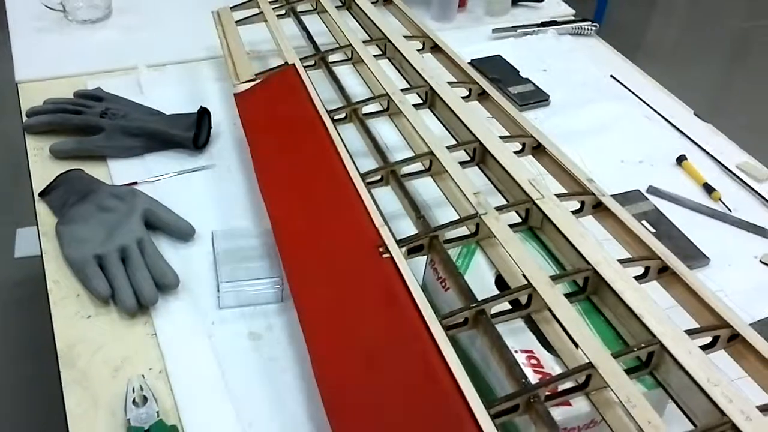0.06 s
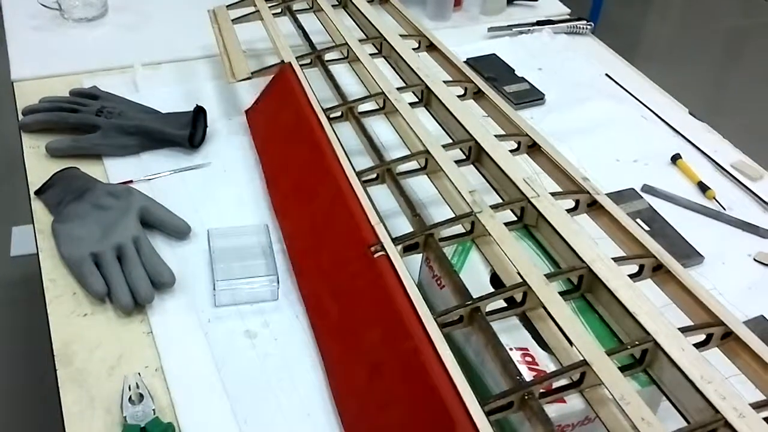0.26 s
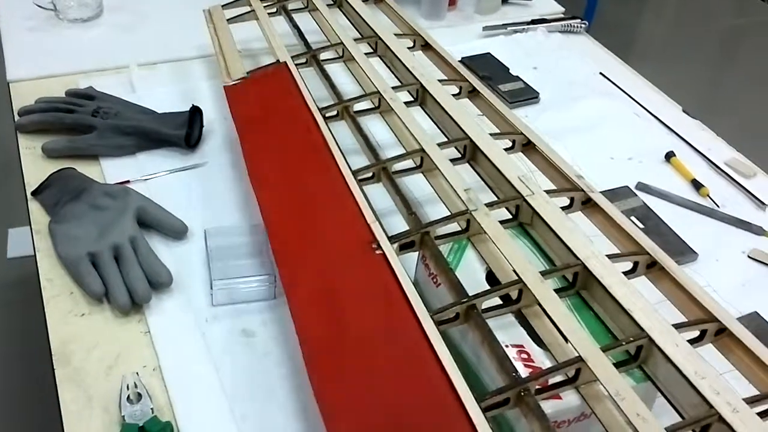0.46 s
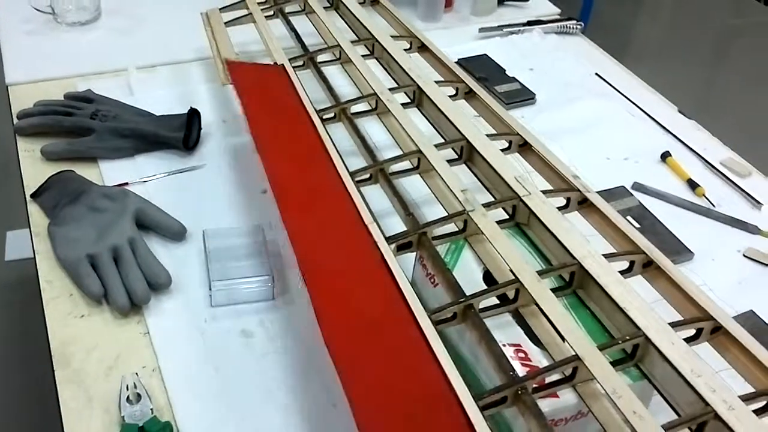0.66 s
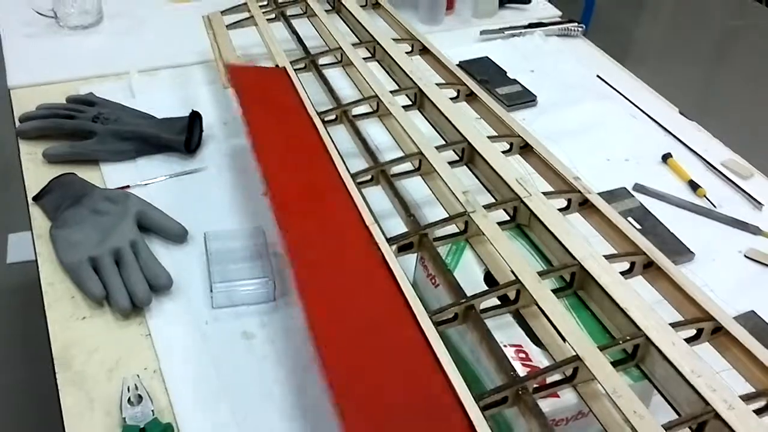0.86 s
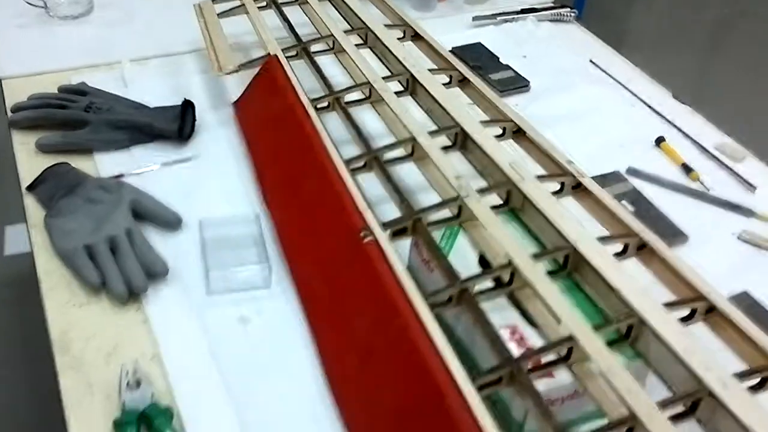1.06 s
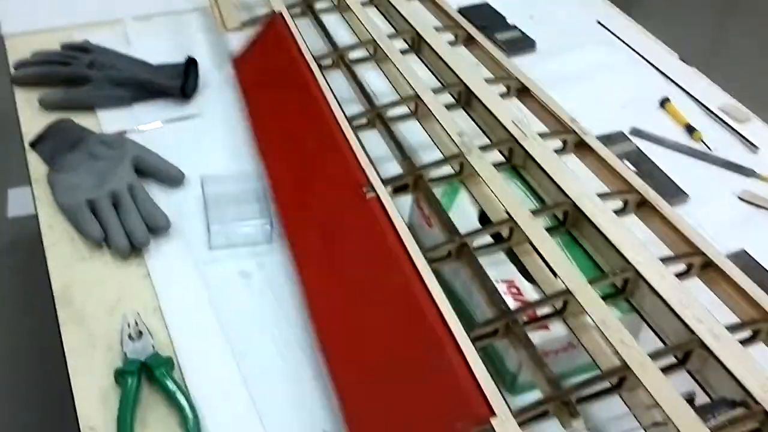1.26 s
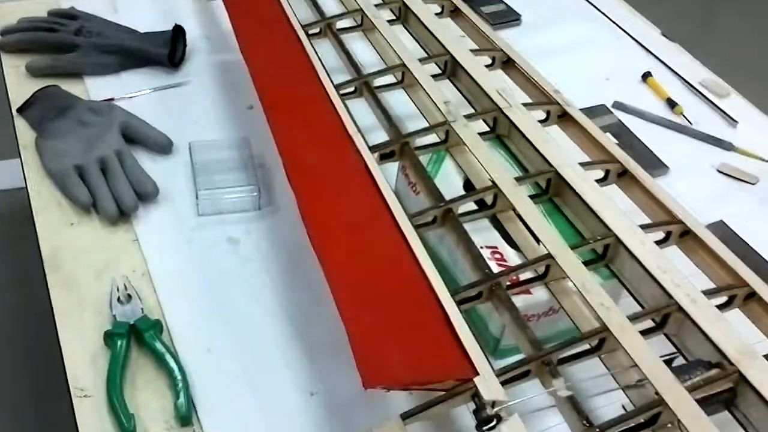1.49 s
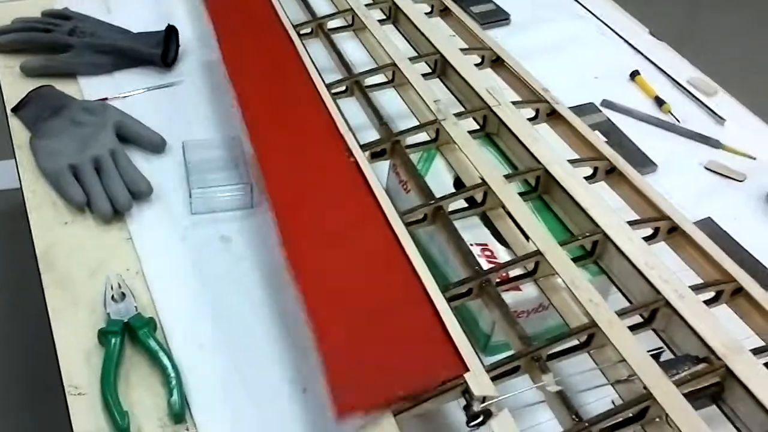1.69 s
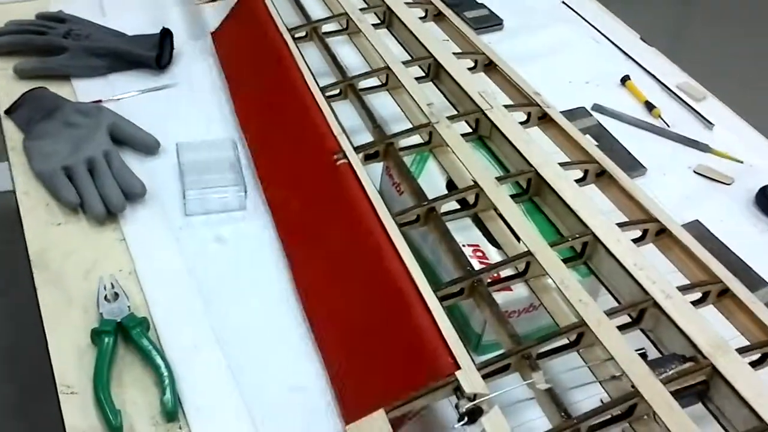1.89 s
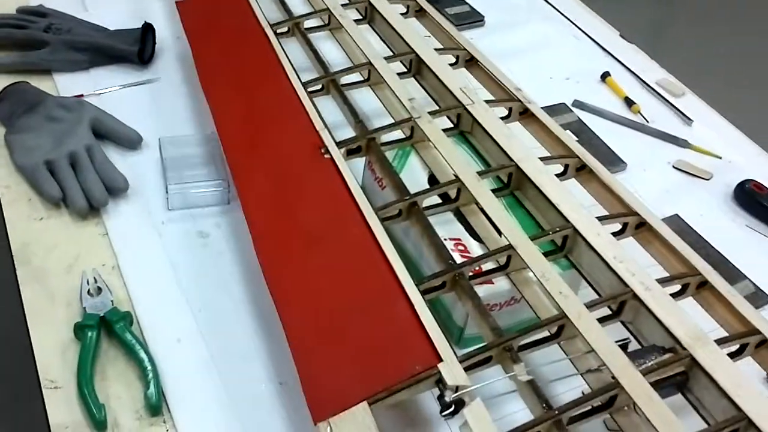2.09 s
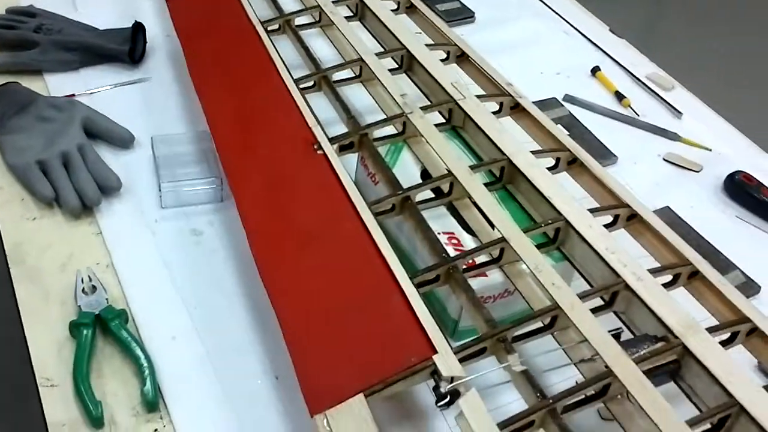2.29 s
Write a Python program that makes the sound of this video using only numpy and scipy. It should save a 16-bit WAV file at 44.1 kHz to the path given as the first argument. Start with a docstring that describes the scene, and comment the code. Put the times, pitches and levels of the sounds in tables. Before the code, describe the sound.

A small servo whirs in about six quick, rasping bursts, swinging the flap of a wooden model wing back and forth. Its gears rattle and whine, the linkage knocks lightly, and the flap chatters to a stop, close by in a workshop.

```python
"""On a workbench, a small servo swings the aileron of a bare wooden model wing back and forth.
Tooth impacts force the wing frame into vibration: the gears rattle, and rasp brightly whenever the
motor drives hard. At full speed their periodic meshing is heard as a whine. The slack linkage knocks
now and then as the aileron swings; on the last swing the aileron chatters to a stop."""
import sys
import numpy as np
from scipy import signal
from scipy.fft import rfft, irfft
from scipy.io import wavfile
from scipy.ndimage import uniform_filter1d

SR = 44100
rng = np.random.default_rng(int(sys.argv[2]) if len(sys.argv) > 2 else 0)


def int16_out(signal):
    """Quantize to a 16-bit WAV file."""
    q = np.round(np.clip(np.atleast_2d(signal).T, -1, 1) * 32767)
    wavfile.write(sys.argv[1], SR, q.astype(np.int16))


N = 108045
T = np.arange(N) / SR

# Levels in the tables are relative; each source applies its own gain.
# Spectral density of the room noise: frequency_hz, level_db
NOISE_SPECTRUM = [(20,-6.5), (45,2.5), (100,-3), (200,-3), (400,-8.5), (1000,-7.5), (2500,-18.5),
                  (5000,-20), (10000,-22), (16000,-30)]
# Reverberation time of the workshop: frequency_hz, t60_s
ROOM_DECAY = [(200,0.39), (1000,0.29), (2500,0.29), (5000,0.16), (12000,0.089)]
# Resonances of wing and servo case: frequency_hz, width_hz, lift_db
WING_MODES = [(416,68,4), (683,35,11), (1141,71,4.5), (1474,45,3.5), (1720,40,6.5), (1906,86,2.5),
              (2085,82,1.5), (2475,54,4.5), (2790,55,8), (3390,100,5), (3910,230,2), (4637,160,5.5)]
# Spectral envelopes of the sounds that pass through the wing: frequency_hz, level_db
THUD_SPECTRUM = [(100,-27), (270,-17.5), (370,-2.5), (460,6.5), (560,1.5), (700,-8), (1000,-3), (3000,-80)]
BLOW_SPECTRUM = [(100,-29.5), (250,-23), (340,-5.5), (460,-4), (600,-2.5), (780,-6.5), (930,8), (1150,6),
                 (1300,1.5), (1500,3.5), (1750,-3), (2200,-2.5), (2700,-17.5), (3050,-14.5), (3600,-13),
                 (5000,-22), (7500,-43.5), (11000,-43), (16000,-58)]
RASP_SPECTRUM = [(100,-42.5), (330,-33), (600,-12.5), (800,-15), (1150,-3), (1700,1), (2300,6.5), (3050,-4),
                 (3600,-5), (4600,-0.5), (5100,-5.5), (6500,-7), (7400,-15), (8400,-10), (9300,-21.5),
                 (10200,-5), (11200,-9), (12500,-21), (14500,-31), (16000,-81)]
MAIN_RING_SPECTRUM = [(100,-55), (450,-52), (660,-39), (850,-32), (1200,-31), (1550,-21), (1950,1.5),
                      (2500,-0.5), (2800,-5), (3100,-15), (4500,-28.5), (9000,-35), (11000,-50),
                      (15000,-62)]
UPPER_RING_SPECTRUM = [(100,-90), (2400,-55.5), (3000,-5), (3450,6.5), (4000,4), (4400,-5), (5500,-10),
                       (7000,-30.5), (9000,-49), (10800,-22.5), (15000,-50)]
# Slack taken up in the linkage: start_s, knock_db, thud_db
LINKAGE_KNOCKS = [(.183,-45,-50), (0.64,-43,-55.5), (.922,-34,-64), (1.003,-34,-44), (1.421,-44,-50.5),
                  (1.828,-30.5,-44.5)]
# Blows of the chattering aileron: start_s, level_db
CHATTER_BLOWS = [(1.950,-31), (1.974,-21), (1.997,-48), (2.017,-21), (2.035,-30.5), (2.055,-24.5),
                 (2.074,-27.5), (2.089,-25.5), (2.104,-32), (2.118,-39.5), (2.131,-28), (2.142,-30),
                 (2.151,-29), (2.159,-28.5), (2.168,-32.5), (2.176,-31.5), (2.185,-35), (2.21,-45)]
# Shaking of the frame under the chatter: time_s, level_db
FRAME_SHAKE = [(1.948,-53), (1.98,-40.5), (2.06,-40.5), (2.14,-49), (2.18,-36), (2.205,-48), (2.228,-62),
               (2.285,-58), (2.34,-70), (2.45,-86)]
# Gear tones at steady speed: start_s, length_s, first_pitch_hz, last_pitch_hz, level_db, octave_db
MESH_TONES = [(0.12,0.074,2020,2000,-71.5,12), (.376,0.039,2480,2465,-39,-22),
              (0.392,0.039,1960,2104,-35.5,-3.5), (0.424,0.031,2023,1926,-34,-4),
              (.44,0.041,1220,1038,-48.5,-14), (0.456,0.079,1970,2029,-46,-11.5),
              (.612,0.03,2440,2485,-34.5,-30), (0.647,0.028,3424,3735,-32.5,-28),
              (0.661,0.015,1890,1976,-27,-6), (0.775,.075,1957,1840,-61.5,-34),
              (0.926,0.052,1646,1580,-43.5,-14), (.94,0.037,2460,2430,-50,-26),
              (1.013,0.048,2039,2070,-39.5,-14), (1.265,0.045,2227,2207,-44.5,8),
              (1.301,0.054,2260,2200,-33,-17.5), (1.38,.026,2560,2440,-31,-20),
              (1.397,0.025,1454,1430,-38.5,-8), (1.414,0.019,3430,3520,-32,-20),
              (1.426,0.056,1952,1959,-37,-11), (1.557,0.0666,1893,2090,-51.5,-37),
              (1.652,0.056,2520,2400,-54,-18), (1.676,0.081,2313,2247,-55,7),
              (1.84,0.029,2060,2020,-35.5,-31), (1.984,0.033,2130,2175,-32,-6),
              (2.022,0.029,2300,2420,-32,-14), (2.215,0.088,2205,2195,-52.5,-49),
              (2.3,0.09,2160,2140,-64.5,-29)]
# Spurts of hard drive: start_s, end_s, first_level_db, last_level_db, release_s
DRIVE_SPURTS = [(0.167,0.219,-53,-39,0.015), (0.371,0.467,-45.5,-35,0.0089), (0.595,0.674,-57,-33,0.012),
                (0.846,0.936,-49,-35,0.087), (0.977,1.048,-49,-37.5,0.005), (1.239,1.328,-37.5,-32.5,0.017),
                (1.385,1.474,-42,-32.5,0.01), (1.649,1.754,-54,-37,0.011), (1.761,1.869,-47.5,-34.5,0.013),
                (1.961,2.04,-37.5,-31,0.027)]
# Teeth snapping into contact as the drive takes hold or reverses: start_s, level_db
TOOTH_SNAPS = [(.374,-47.5), (0.857,-55), (1.242,-51), (1.66,-50), (1.747,-32), (1.947,-40)]
# Gear rattle, one list of rows for each swing: time_s, main_ring_db, upper_ring_db
SWING_ENVELOPES = [
    [(0.0, -50.5, -53.5), (0.088, -59.5, -65.5), (0.098, -48, -52), (0.118, -48.5, -51.5),
     (0.174, -49.5, -56), (0.182, -43, -42.5), (0.222, -37.5, -41), (0.242, -47, -49.5), (0.3, -59, -60),
     (0.308, -86, -83), (0.368, -87, -71)],
    [(0.371, -64, -70), (0.375, -65, -53), (0.383, -56, -54), (0.407, -40.5, -41), (0.539, -42, -48),
     (0.629, -36, -37), (0.635, -33.5, -38), (0.661, -34, -36), (0.677, -38.5, -39), (0.769, -49.5, -56),
     (0.845, -55, -64)],
    [(0.848, -51, -68), (0.876, -43.5, -38.5), (0.906, -40.5, -43), (0.938, -32.5, -37.5),
     (0.956, -35, -40), (0.99, -39.5, -45), (1.04, -37.5, -39), (1.096, -44, -53), (1.222, -64.5, -90),
     (1.235, -66, -86.5)],
    [(1.238, -66, -68), (1.254, -38.5, -52), (1.27, -41.5, -43), (1.33, -38.5, -46), (1.35, -41, -49),
     (1.374, -35.5, -37), (1.396, -37.5, -39.5), (1.42, -34, -38), (1.442, -34.5, -36), (1.632, -55, -67.5),
     (1.646, -64, -72)],
    [(1.652, -59, -83), (1.662, -56.5, -67), (1.682, -40.5, -46.5), (1.754, -36, -41.5),
     (1.764, -39.5, -54), (1.788, -38, -39.5), (1.8, -38, -51), (1.84, -41, -41.5), (1.854, -53, -43),
     (1.87, -34, -47), (1.94, -49, -53)],
    [(1.943, -43, -74), (1.949, -39, -36), (1.961, -45, -64), (1.973, -36.5, -40), (2.183, -39, -54.5),
     (2.203, -69, -80), (2.231, -53, -85), (2.251, -58, -75), (2.295, -57.5, -90), (2.335, -70, -90),
     (2.45, -79, -81)],
]


def amp(db):
    """Amplitude ratio of a level in decibels."""
    return 10 ** (np.asarray(db) / 20)


def unit(x):
    """Normalisation to an rms of 1."""
    return x / np.sqrt(np.mean(x ** 2) + 1e-20)


def at_frequency(points, hz):
    """Interpolation of a table on a logarithmic frequency axis."""
    f, value = np.transpose(points)
    return np.interp(np.log(hz + 1), np.log(f + 1), value)


def envelope(points):
    """Amplitude envelope from rows of time_s, level_db; silent before the first."""
    return amp(np.interp(T, *np.transpose(points), left=-np.inf))


def wander(cutoff_hz):
    """Random fluctuation: low-pass noise with an rms of 1."""
    hz = np.fft.rfftfreq(N, 1 / SR)
    return unit(irfft(rfft(rng.standard_normal(N)) / (1 + (hz / cutoff_hz) ** 4), N))


def room_noise(level_db=-70):
    """Stationary noise, strongest at low frequencies, forms the faint background."""
    colour = amp(at_frequency(NOISE_SPECTRUM, np.fft.rfftfreq(N, 1 / SR)))
    return amp(level_db) * unit(irfft(rfft(rng.standard_normal(N)) * colour, N))


def reflections(x, bench_db=-6, bench_decay_s=0.0026, room_db=-15.5):
    """Reverberation: early reflections off the bench precede the room's exponential decay."""
    t = T[:SR // 2]
    near, far = rng.standard_normal((2, len(t))) * (rng.random((2, len(t))) < 0.1)
    near = near * np.exp(-t / bench_decay_s) * (t > 0.001)
    hz, frame_s, spectrum = signal.stft(far * (t > 0.008), SR, nperseg=256)
    decay = amp(-60 * frame_s / at_frequency(ROOM_DECAY, hz)[:, None])
    tail = signal.istft(spectrum * decay, SR, nperseg=256)[1][:len(t)]
    echo = amp(bench_db) * near / np.linalg.norm(near) + amp(room_db) * tail / np.linalg.norm(tail)
    return x + signal.oaconvolve(x, echo)[:N]


def wing(force, spectrum, size=8192):
    """Forced vibration: the wing is a minimum-phase filter, its modes peaks on a broad spectrum."""
    hz = np.fft.rfftfreq(size, 1 / SR)
    peaks_db = sum(lift / (1 + (2 * (hz - f) / width) ** 2) for f, width, lift in WING_MODES)
    db = at_frequency(spectrum, hz) + peaks_db
    log_gain = np.log(amp(np.r_[db, db[-2:0:-1]]))
    ring = np.fft.ifft(np.exp(np.conj(signal.hilbert(log_gain)))).real[:size // 2]
    return signal.oaconvolve(force, ring / np.linalg.norm(ring))[:N]


def frame_mode(force, hz, width_hz):
    """Resonance about a fixed or moving frequency; two stages in cascade steepen its sides."""
    carrier = np.exp(2j * np.pi * np.cumsum(hz * np.ones(N)) / SR)
    pole = np.exp(-np.pi * width_hz / SR)
    return unit((carrier * signal.lfilter([1], [1, -2 * pole, pole * pole], force / carrier)).real)


def tooth_force(rub, teeth_per_s=2100, motor_hz=254.3):
    """An uneven impulse train with friction noise, amplitude-modulated by each turn of the motor."""
    speed = 1 + np.clip(0.1 * wander(25), -0.5, 0.5)
    teeth_passed = np.cumsum(teeth_per_s * speed * (1 + 0.15 * wander(1500))) / SR
    spread = amp(2 * np.clip(rng.standard_normal(N), -2, 2))
    clicks = np.diff(np.floor(teeth_passed), prepend=0) * spread * rng.choice([-1, 1], N)
    throb = 1 + 0.15 * np.cos(2 * np.pi * np.cumsum(motor_hz * speed) / SR)
    contact = unit(clicks) + rub * rng.standard_normal(N)
    judder = amp(2 * wander(190))
    return unit(contact * throb * judder)


def aileron_thuds(shake_db=-8, delay_s=0.021, width_s=0.013):
    """Low-frequency response: the aileron shudders just after each knock and through the chatter."""
    swell = sum(amp(db) * np.exp(-((T - start - delay_s) / width_s) ** 2)
                for start, _, db in LINKAGE_KNOCKS)
    return (swell + amp(shake_db) * envelope(FRAME_SHAKE)) * wing(rng.standard_normal(N), THUD_SPECTRUM)


def knocks_and_chatter(gain_db=20, contact_db=-11, delay_s=0.00129, width_s=0.0019):
    """Impact excitation: each blow is an impulse in a crunch of wood; the frame shakes in the chatter."""
    force, grit = np.zeros(N), rng.standard_normal(N)
    for start, db, *_ in LINKAGE_KNOCKS + CHATTER_BLOWS:
        crunch = grit * np.exp(-((T - start - delay_s) / width_s) ** 2)
        force += 0.82 * amp(db) * crunch / np.linalg.norm(crunch)
        force[round((start + delay_s) * SR)] += amp(db + contact_db)
    shake = envelope(FRAME_SHAKE) * tooth_force(rub=0.1)
    return wing(amp(gain_db) * force + shake, BLOW_SPECTRUM)


def gear_whine(fade_s=0.016):
    """Periodic meshing radiates five harmonics that waver in pitch and amplitude."""
    out = np.zeros(N)
    waver, rough = 1 + 0.015 * wander(280), 1 + 0.28 * wander(340)
    jitter_rad = 0.17 * wander(650)
    for start, length, first_hz, last_hz, db, octave_db in MESH_TONES:
        on = (T >= start) & (T < start + length)
        t = T[on] - start
        pitch_hz = (first_hz + (last_hz - first_hz) * t / length) * waver[on]
        phase = 2 * np.pi * np.cumsum(pitch_hz) / SR + jitter_rad[on]
        overtones = np.sin(2 * phase) + sum(amp(-11.5 - 2 * k) * np.sin((3 + k) * phase) for k in range(3))
        fade = np.minimum(np.minimum(t, length - t) / fade_s, 1)
        out[on] += np.sqrt(2) * amp(db) * fade * rough[on] * (np.sin(phase) + amp(octave_db) * overtones)
    return out


def gear_rasp(gain_db=-4.5, attack_s=0.032, snap_decay_s=0.0035):
    """Hard impacts excite high frequencies: teeth strike brightly under drive and as they snap home."""
    effort = np.zeros(N)
    for start, end, first_db, last_db, release_s in DRIVE_SPURTS:
        attack = np.clip((T - start) / attack_s, 0, 1)
        release = np.exp(-np.maximum(T - end, 0) / release_s)
        effort += amp(np.interp(T, [start, end], [first_db, last_db])) * attack * release
    snaps = sum(amp(db) * (T >= start) * np.exp(-abs(T - start) / snap_decay_s)
                for start, db in TOOTH_SNAPS)
    return amp(gain_db) * (effort + snaps) * wing(tooth_force(rub=0.29), RASP_SPECTRUM)


def gear_rattle(whine, ring_db=-3.5, buzz_reference_db=-34):
    """Structure-borne sound: tooth impacts ring the wing and set its frame buzzing and humming."""
    rows = np.vstack(SWING_ENVELOPES)
    main, upper = envelope(rows[:, [0, 1]]) + 1e-9, envelope(rows[:, [0, 2]])
    force = tooth_force(rub=0.6)
    strength = main / amp(buzz_reference_db)
    buzz_hz = np.clip(1262 - 37 * 20 * np.log10(strength), 1100, 2150)  # sinks 37 Hz per dB of rattle
    buzz = amp(-48) * strength ** 0.99 * frame_mode(force, buzz_hz, width_hz=400)
    hum = amp(-70) * strength ** 0.65 * frame_mode(force, hz=623, width_hz=120)
    whine_power = abs(uniform_filter1d(whine ** 2, size=400))
    give_way = 1 / np.sqrt(1 + 0.2 * whine_power / main ** 2)  # the main ring dips under the whine
    main_ring = give_way * main * wing(force, MAIN_RING_SPECTRUM)
    upper_ring = upper * wing(tooth_force(rub=0.16), UPPER_RING_SPECTRUM)
    return amp(ring_db) * (main_ring + upper_ring) + buzz + hum


def scene():
    """Superposition: gear and aileron impacts with their reflections, the direct whine, room noise."""
    whine = gear_whine()
    impacts = gear_rattle(whine) + gear_rasp() + knocks_and_chatter() + aileron_thuds()
    return (reflections(impacts) + whine + room_noise())[None]


def record(dry, cutoff_hz=15750):
    """Band limiting: a steep low-pass filter removes the highest treble."""
    low_pass = signal.firwin(511, cutoff_hz, window=("kaiser", 9), fs=SR)
    return signal.oaconvolve(dry, low_pass[None], "same")


dry = scene()
out = record(dry)
int16_out(out)
```